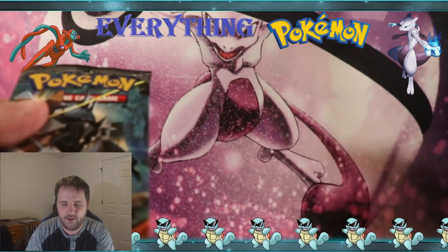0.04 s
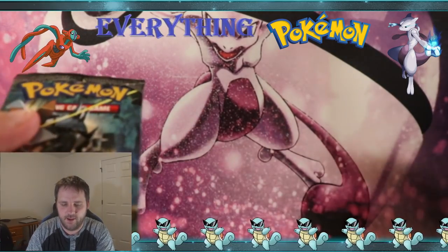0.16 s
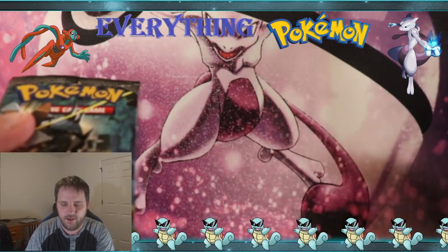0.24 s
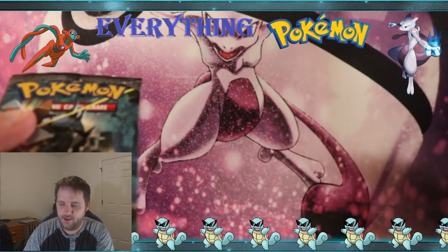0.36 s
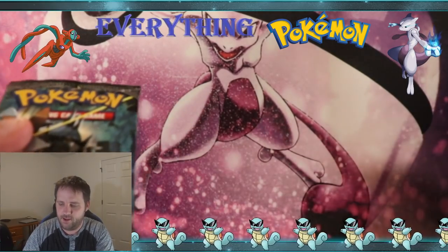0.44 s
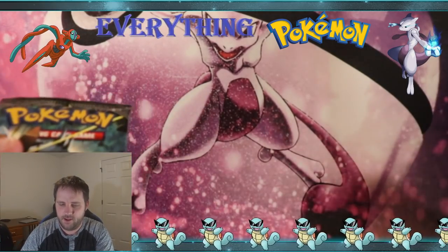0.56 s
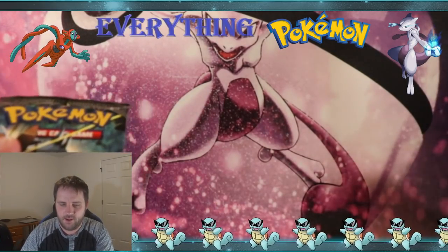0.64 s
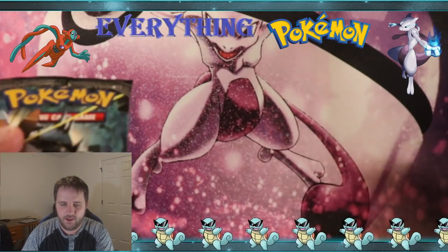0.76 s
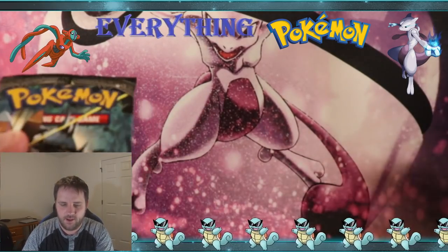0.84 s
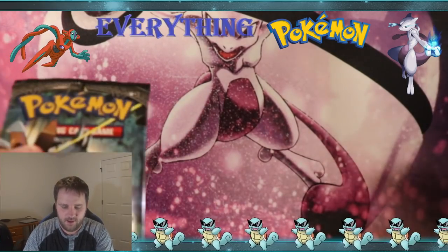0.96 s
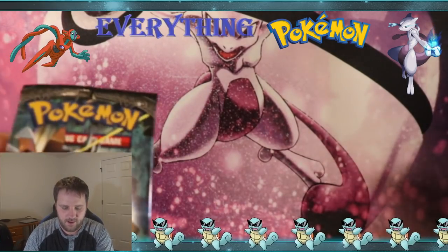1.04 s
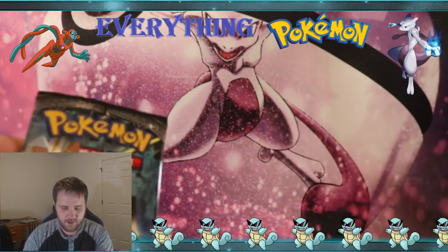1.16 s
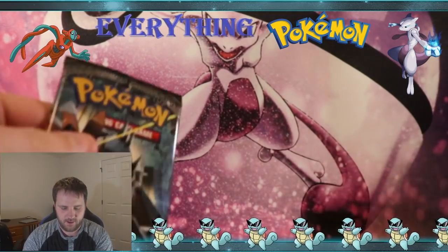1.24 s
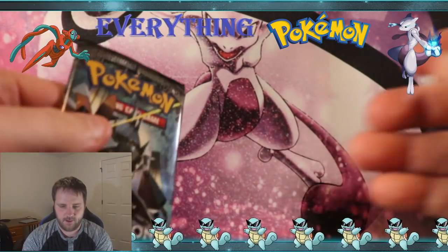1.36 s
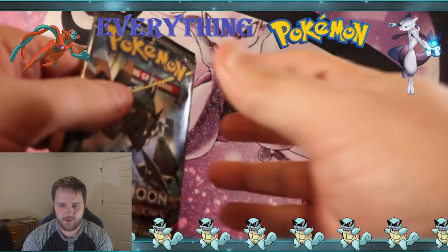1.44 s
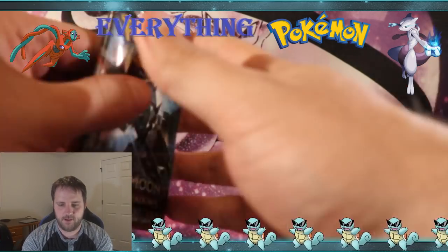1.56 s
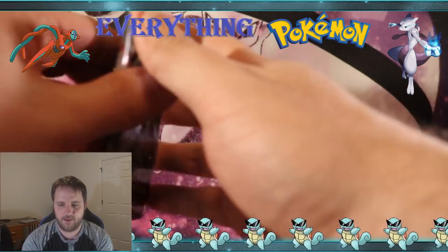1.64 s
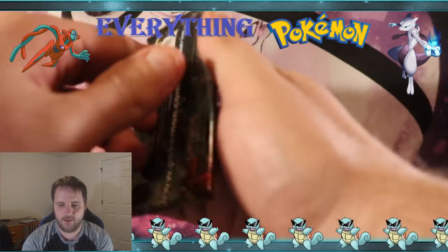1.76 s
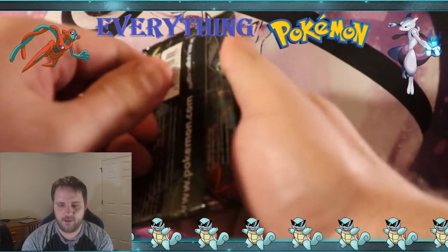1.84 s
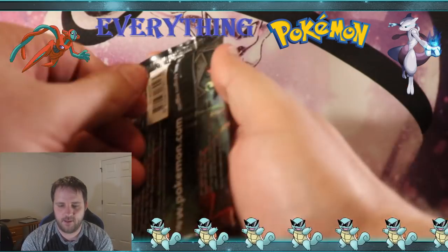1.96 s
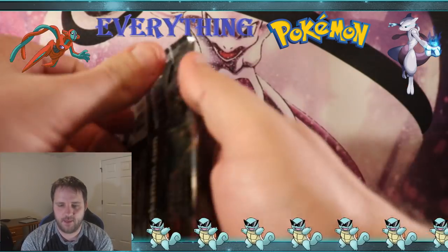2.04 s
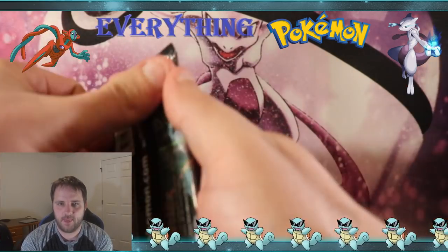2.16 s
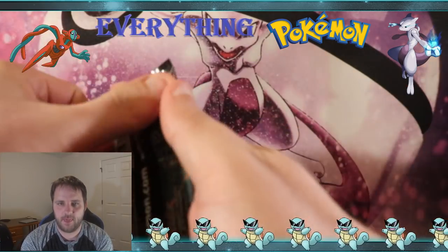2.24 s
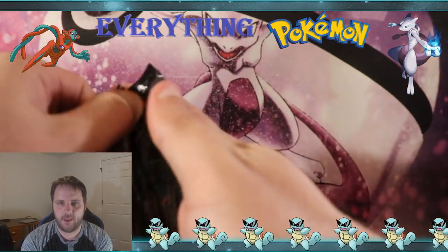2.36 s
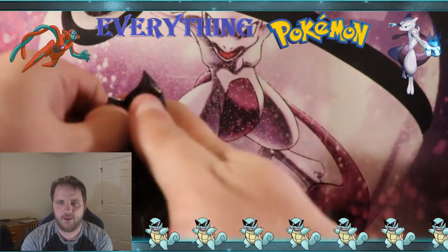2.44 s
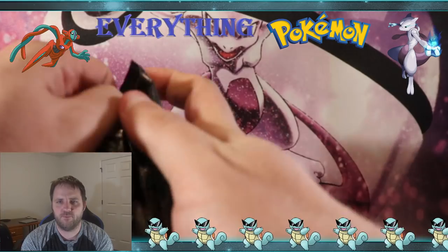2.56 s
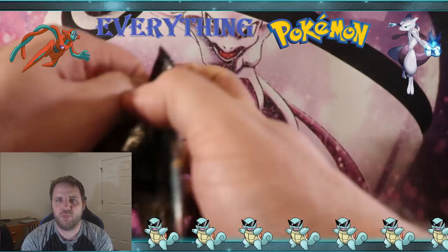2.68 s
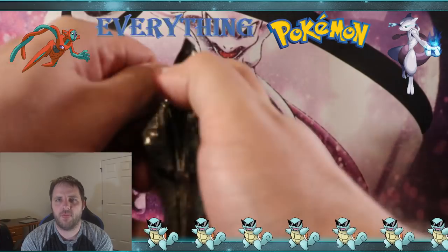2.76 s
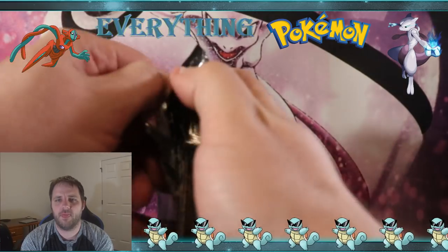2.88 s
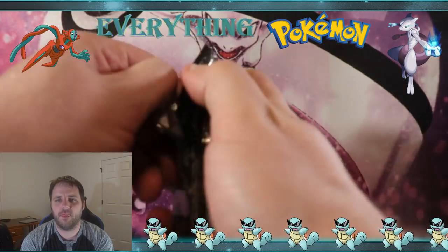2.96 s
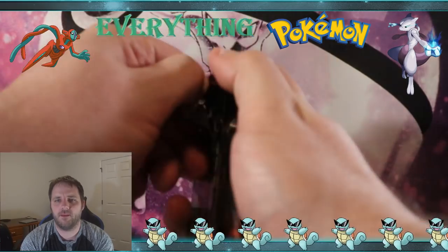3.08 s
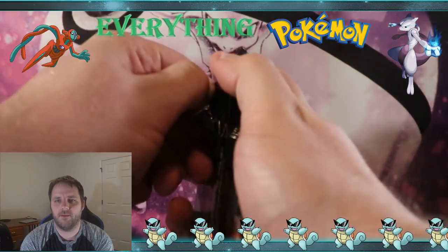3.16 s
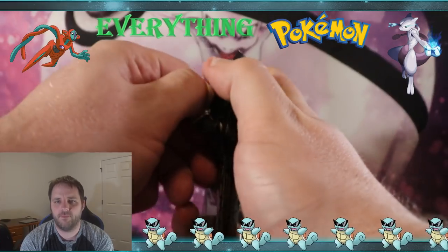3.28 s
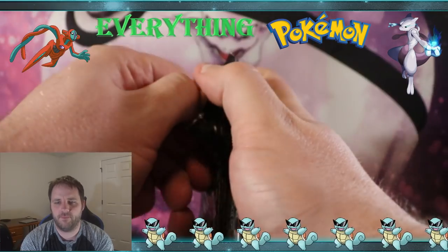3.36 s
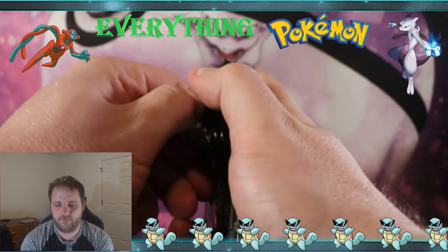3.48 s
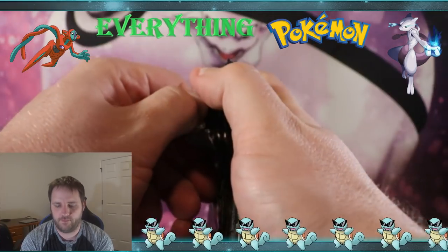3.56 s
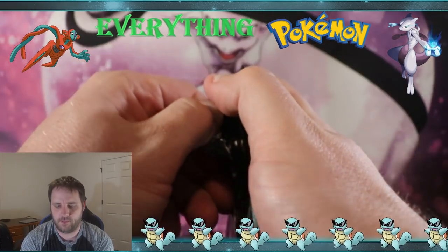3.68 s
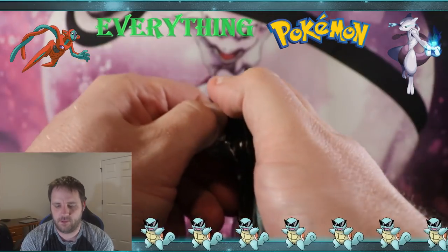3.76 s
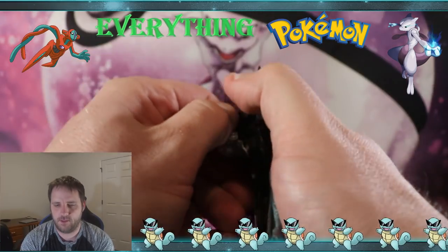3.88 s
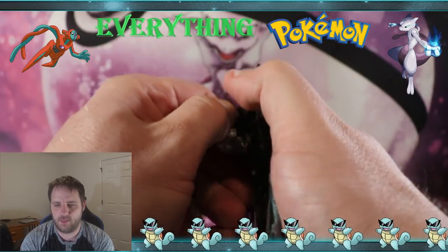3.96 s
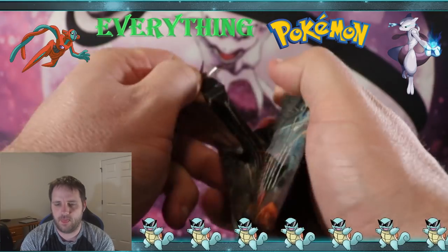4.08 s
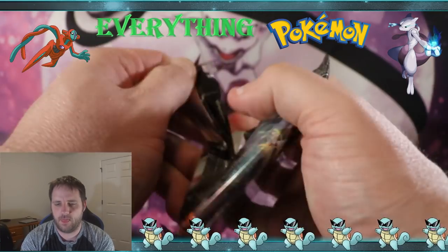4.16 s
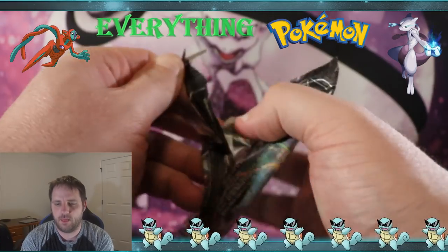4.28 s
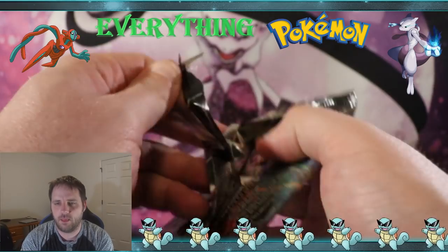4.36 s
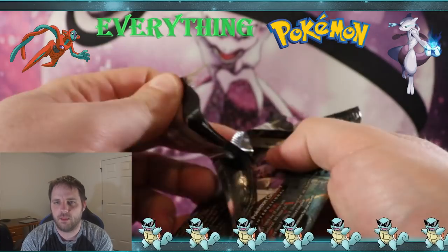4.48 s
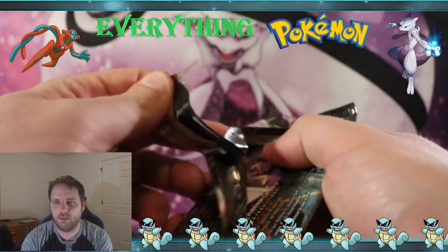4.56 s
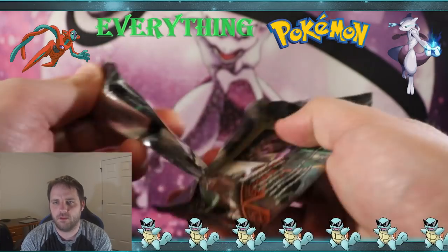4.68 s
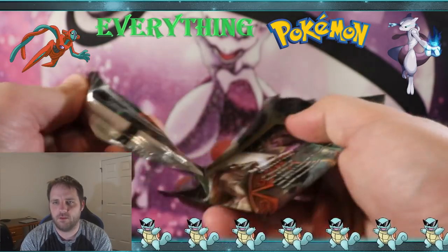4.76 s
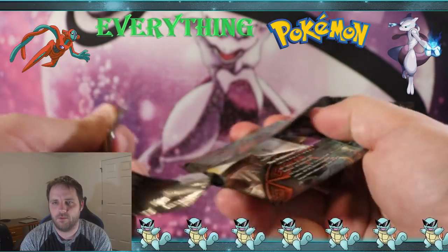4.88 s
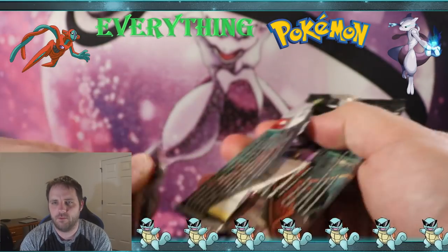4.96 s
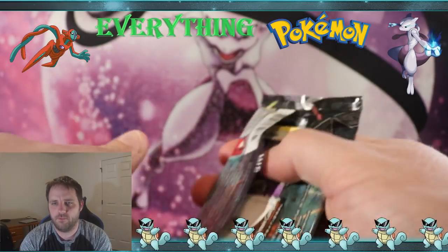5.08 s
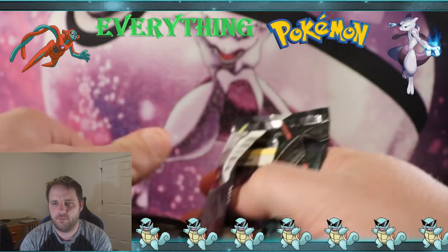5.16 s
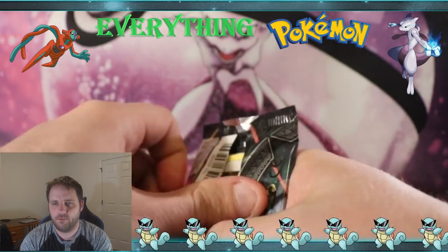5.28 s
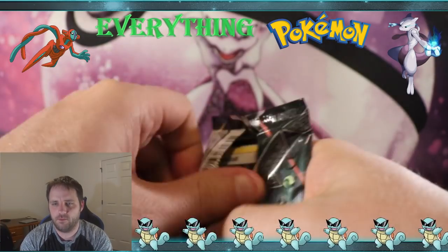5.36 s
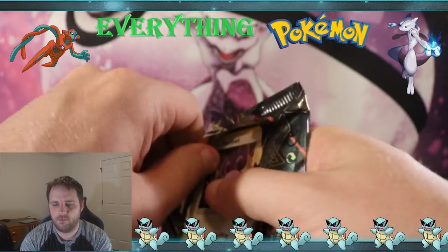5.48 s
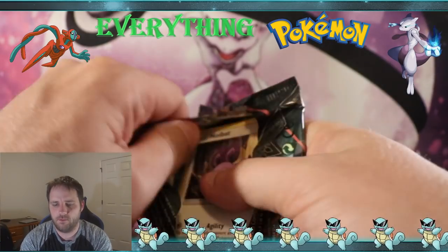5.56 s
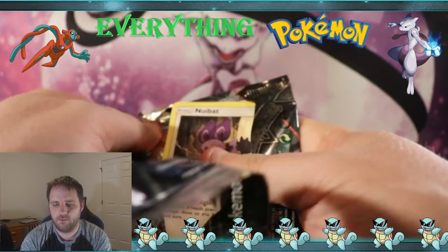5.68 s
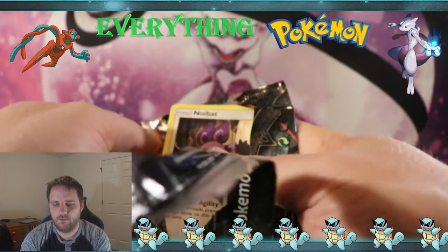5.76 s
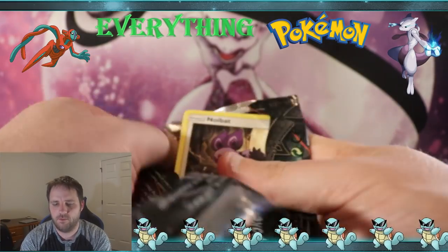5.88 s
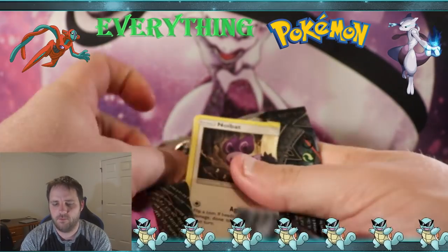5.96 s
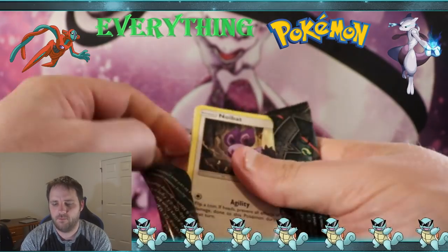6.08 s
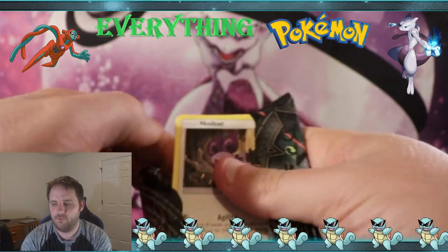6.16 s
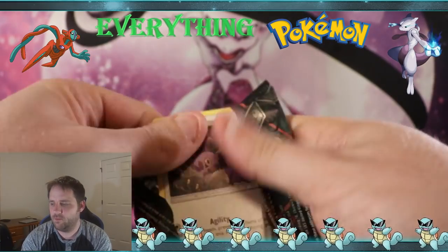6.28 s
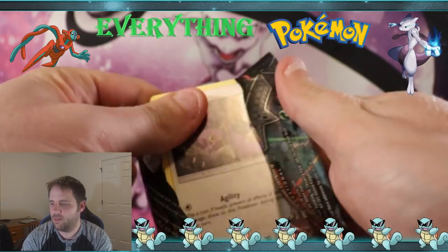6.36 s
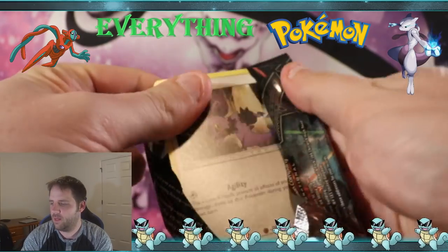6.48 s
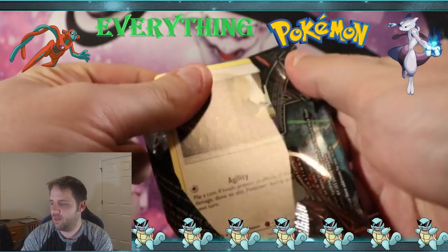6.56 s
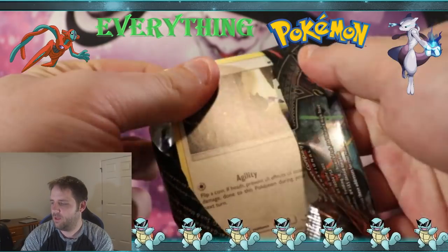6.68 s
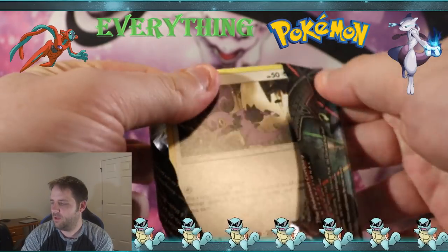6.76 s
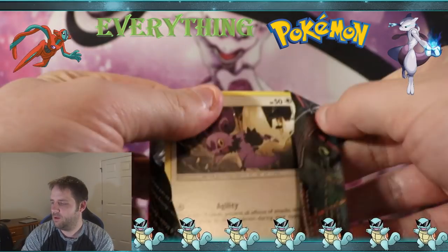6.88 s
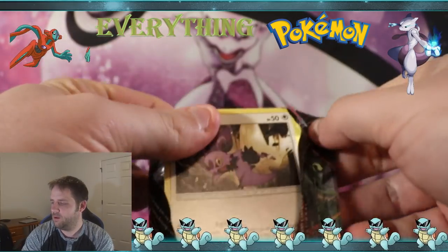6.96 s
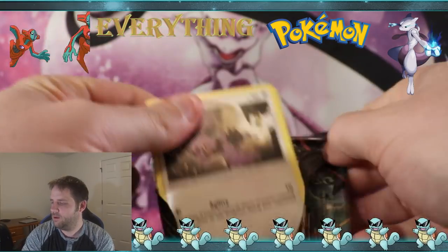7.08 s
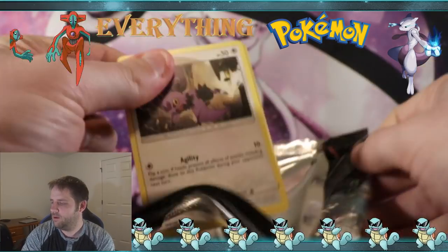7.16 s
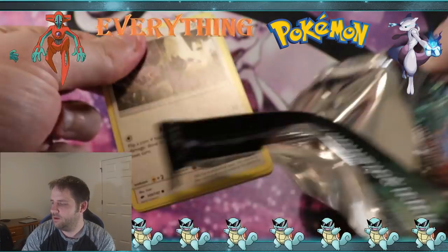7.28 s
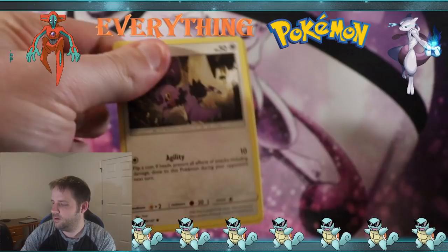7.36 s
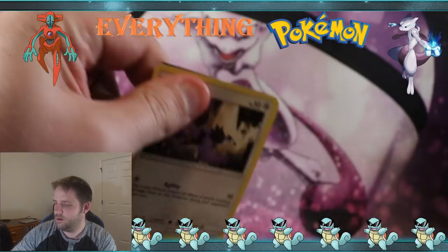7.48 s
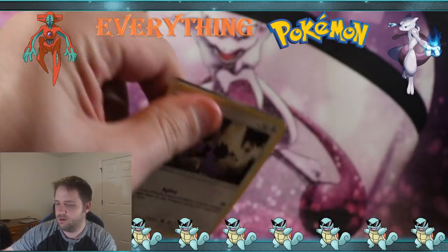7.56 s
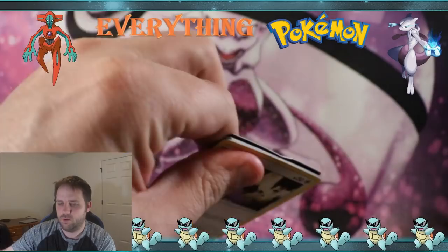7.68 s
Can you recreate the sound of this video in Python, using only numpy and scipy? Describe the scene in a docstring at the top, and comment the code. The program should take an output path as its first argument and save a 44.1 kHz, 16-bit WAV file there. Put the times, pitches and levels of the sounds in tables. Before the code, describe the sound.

Close, bright foil crackling in a small room: quiet start, brief lull, a loud tearing crack, busy crinkling, soft hand thuds, faint hum.

```python
"""A foil card wrapper is turned, pinched, ripped along its seam and peeled off the cards, close to a mic.
After a faint start, creases buckle with sharp snaps; a lull follows, then the loudest crack near 4 s,
and snaps go on until they thin out after 7 s. Swarms of tiny crinkles are random clicks ringing in small
resonators; each snap is a struck, filtered push, and soft thuds of the hands are swelling noise bands.
Desk echoes and a small live room answer the foil, over steady air noise and a low wavering hum."""
import sys
import numpy as np
from scipy import signal
from scipy.fft import rfft, irfft
from scipy.io import wavfile
from scipy.ndimage import uniform_filter1d

SR = 44100
rng = np.random.default_rng(int(sys.argv[2]) if len(sys.argv) > 2 else 0)


def dump_mix(stems):
    """Bounce the given channels to the path in sys.argv[1] as a 16-bit WAV at rate SR."""
    frames = np.atleast_2d(stems).T  # one column per channel
    limited = np.clip(frames, -1, 1)  # hard clip at full scale
    pcm = np.round(limited * 32767).astype(np.int16)
    wavfile.write(sys.argv[1], SR, pcm)


N = 340363

# the loudest creases that buckle, levels ahead of the foil tone:
# (time [s], level over the first 4 ms [dB], facet pitch [Hz], brightness [dB])
SNAPS = [(0.9, -48, 7800, 1.5), (0.9585, -37, 4400, 0.5), (1.1371, -38.5, 5200, -0.5),
         (1.789, -48, 2500, -13), (1.8426, -36, 2860, 4.5), (1.9433, -48, 4930, -7),
         (2.0526, -37, 2960, -1), (2.0886, -34, 3050, 4), (2.27, -30.5, 4360, 4), (2.356, -44, 4900, 7),
         (2.3941, -34, 2880, -1), (2.4441, -30.5, 4500, -1.5), (2.4627, -32.5, 3040, 12),
         (2.5249, -31.5, 6400, 12.5), (2.5503, -43, 7450, 9), (2.591, -37.5, 6600, 1.5),
         (2.6499, -36.5, 2800, 6.5), (2.7398, -40.5, 3900, -4), (2.787, -26.5, 2900, -1.5),
         (2.8753, -44, 980, -4), (2.9222, -31, 4100, 5.5), (3.152, -47.5, 9350, 12),
         (3.1964, -43.5, 3010, 10), (3.2228, -40, 8400, 4), (3.7166, -48, 4120, 3.5),
         (3.8624, -41, 6600, 6.5), (4.0481, -45.5, 6700, 8), (4.0623, -38, 2960, -2),
         (4.067, -32.5, 2950, -3.5), (4.0782, -31, 3060, -3), (4.0817, -20, 2850, 1.5),
         (4.0893, -25.5, 2710, -2.5), (4.258, -34.5, 1090, -26), (4.391, -35, 4400, -7.5),
         (4.5306, -38, 2840, -5), (4.5601, -42, 2900, -19), (4.6014, -42.5, 2820, -9), (4.7, -40, 3160, 2),
         (4.7356, -38, 2670, -2), (4.7559, -30.5, 1250, -1.5), (4.7675, -27, 4350, -1),
         (4.8184, -27.5, 3020, -0.5), (5.0136, -46.5, 2580, 2), (5.0409, -41.5, 2970, 3.5),
         (5.141, -28, 1540, 3), (5.3538, -49, 2500, -2), (5.4474, -43, 7000, -0.5), (5.5062, -33, 2950, -4),
         (5.53, -40, 3800, -12), (5.5535, -30.5, 6100, -2.5), (5.5851, -36.5, 4700, -2),
         (5.6021, -37, 5330, 0), (5.6632, -30, 2680, -1.5), (5.722, -29.5, 1240, -1.5),
         (5.7811, -29.5, 2700, 4.5), (5.8024, -32, 6900, 6.5), (5.8822, -29.5, 2900, 7.5),
         (5.9424, -39, 3770, 3), (5.9935, -36, 1120, 3), (6.023, -39, 1350, 3), (6.042, -37, 930, -1.5),
         (6.0623, -33, 1120, -3), (6.1834, -42.5, 1340, 4), (6.235, -36.5, 990, -30),
         (6.2445, -38.5, 3160, 0.5), (6.2762, -44, 3200, -7), (6.3037, -39, 1340, -13),
         (6.3305, -42, 4670, -9), (6.3573, -41, 3750, 3), (6.3722, -24.5, 3550, -0.5),
         (6.39, -32, 1320, -2), (6.5482, -41.5, 4440, -2), (6.5633, -33.5, 5170, 7),
         (6.5857, -33, 4570, -5), (6.6529, -45, 2910, -10), (6.7458, -45, 3240, -9),
         (6.7944, -40.5, 7260, 6), (6.804, -37.5, 1640, 0.5), (6.9396, -32, 6150, 9),
         (6.991, -39.5, 1740, -3.5), (7.1502, -48, 1330, -4), (7.179, -29.5, 3020, -17),
         (7.187, -26, 2970, 3), (7.3413, -29.5, 1410, 2), (7.4105, -42.5, 1430, 2),
         (7.4957, -47.5, 960, -12)]
# where the foil radiates, as body (whole panels), crack (creases), fizz (tiny facets): (low [Hz], high [Hz])
REGISTERS = [(380, 2210), (1600, 5800), (5100, 9130)]
# body of the foil sound, rising and falling as the wrapper is handled: (time [s], body level [dB])
FOIL_BODY = [(0.9, 0), (1.9, -21.5), (2.4, -11), (2.8, -5), (3.6, -30), (4.1, -8), (4.55, -10), (4.8, 0),
             (5.15, -4), (5.55, -8), (5.9, 4), (6.4, -7), (7.3, -3)]
REGISTER_FILTERS = [signal.butter(2, edges, "band", fs=SR, output="sos") for edges in REGISTERS]


def from_db(db):
    """Decibels to gain."""
    return 10 ** (np.asarray(db) / 20)


def rms_one(x):
    """Scale to rms 1."""
    return x / np.sqrt(np.mean(x ** 2) + 1e-20)


def energy_one(x):
    """Scale to a total energy of 1."""
    return x / np.sqrt(np.sum(x ** 2) + 1e-20)


def in_time(rows):
    """Each column of a curve table at every sample."""
    s, *columns = np.transpose(rows)
    return [np.interp(np.arange(N) / SR, s, c) for c in columns]


def at_hz(points, hz):
    """Read a spectrum on a log-frequency axis."""
    f, value = np.transpose(points)
    return np.interp(np.log(hz + 1), np.log(f), value)


def band(x, low_hz, high_hz):
    """Causal band-pass."""
    edges = [low_hz, min(high_hz, SR / 2 - 1000)]
    return signal.sosfilt(signal.butter(2, edges, "band", fs=SR, output="sos"), x + 1e-18)


def resonate(x, hz, width_hz):
    """One resonance, gain about 1 on top; a wider peak dies sooner."""
    r = np.exp(-np.pi * width_hz / SR)
    zeros = np.array([1, 0, -1]) * (1 - r * r) / 2
    poles = [1, -2 * r * np.cos(2 * np.pi * hz / SR), r * r]
    return signal.lfilter(zeros, poles, x + 1e-18)


def add(track, s, wave):
    """Mix a short wave into a track at time s."""
    at = round(s * SR)
    track[at:at + len(wave)] += wave


def snaps(wander, scatter_s, middle_hz):
    """Each snap arrives directly and off nearby surfaces, and is also thrown into the room."""
    # echoes from the desk, screen and backdrop: (mean delay [s], level [dB])
    echoes = [(.0022, -6.5), (.0078, -6.5), (0.0179, -11)]
    body_db_per_octave = 2.5  # larger, lower facets carry more body
    near, thrown = np.zeros((2, N + SR))
    t = np.arange(SR // 200) / SR
    for s, level_db, hz, bright_db in SNAPS:
        body_db = body_at(s, bright_db) + body_db_per_octave * np.log2(middle_hz / hz)
        gains = shares(body_db, bright_db)
        direct = snap_wave(hz, gains, rattle_db=2.5, rattle_t60=0.012,
                           ring_db=8.0, ring_q=10.4, rebound=0.81, flip_s=.0007)
        add(near, s, from_db(level_db) * direct)
        # the sum over all directions is smoother in colour than the direct sound
        spread = from_db(level_db) * snap_wave(hz, gains, rattle_db=-5, rattle_t60=0.011,
                                               ring_db=-4.0, ring_q=7.3, rebound=0.16, flip_s=0.00044)
        add(thrown, s, spread)
        for delay, echo_db in echoes:
            # the pack keeps moving, so the paths change; uneven surfaces smear each echo
            smear = energy_one(rng.standard_normal(len(t)) * np.exp(-t / scatter_s))
            arrival = s + delay * (1 + wander * rng.uniform(-1.1, 1))
            add(near, arrival, from_db(echo_db) * np.convolve(spread, smear))
    return near[:N], thrown[:N]


def snap_wave(hz, gains, rattle_db, rattle_t60, ring_db, ring_q, rebound, flip_s):
    """A crease lets go, slams into its new shape a moment later, and leaves the facet shivering and ringing."""
    t = np.arange(SR // 50) / SR
    shiver = rng.standard_normal(len(t)) * from_db(-60 * t / rattle_t60)
    push = from_db(rattle_db) * energy_one(shiver)
    push[0] += 1
    push[round(flip_s * rng.uniform(.5, 1.5) * SR)] -= rebound
    push = push + from_db(ring_db) * resonate(push, hz, hz / ring_q)
    wave = np.zeros(len(t))
    for k, (gain, sos) in enumerate(zip(gains, REGISTER_FILTERS)):
        # neighbouring registers take opposite signs
        wave += gain * energy_one(signal.sosfilt(sos, push)) * (-1) ** k
    return energy_one(wave) * np.sqrt(.004 * SR)  # the energy of rms 1 held for 4 ms


def crinkle(per_s, crowding, size_db, facet_q, even_s, slide, count=8):
    """Tiny facets flip at random, more often under harder work, over the smooth hiss of sliding foil."""
    flip_db = -71  # crinkle level around which facets start to flip
    level_db, fizz_db = crinkle_effort()
    body_db = body_at(np.arange(N) / SR, fizz_db)
    rate = per_s * from_db(crowding * (level_db + 50))  # per_s flips a second at -50 dB
    sizes = from_db(size_db * np.minimum(rng.exponential(1, N), 4)) * rng.choice([-1, 1], N)
    clicks = sizes * (rng.random(N) < rate / SR)
    # the work of the hands is shared among the flips of each moment
    power = np.maximum(uniform_filter1d(clicks ** 2, int(even_s * SR)), 0)
    clicks = clicks / np.sqrt(power + .5 * rate / SR)
    # a light touch mostly slides; more power goes to flips once the sheet is bent hard enough
    flipping = (1 - np.clip(slide, 0, 1)) / (5 + np.exp((flip_db - level_db) / 2))
    clicks = np.sqrt(flipping) * clicks + np.sqrt(1 - flipping) * rng.standard_normal(N)
    out = np.zeros(N)
    for k, (gain, (low, high)) in enumerate(zip(shares(body_db, fizz_db), REGISTERS)):
        # each sample is dealt to one of a few facets tuned across the register
        dealt = rng.integers(0, count, N)
        rings = np.zeros(N)
        for j, hz in enumerate(np.geomspace(low, high, count)):
            rings += resonate(clicks * (dealt == j), hz, hz / facet_q) / np.sqrt(hz)
        out += gain * rms_one(band(rings, low, high)) * (-1) ** k
    return from_db(level_db) * out


def crinkle_effort():
    """Handling, pulls and flurries after snaps add in power: level and brightness (dB) at every sample."""
    # how hard the hands work the foil between pulls: (time [s], crinkle level [dB])
    handling = [(0.7, -90), (0.8, -68), (1.5, -80), (1.8, -65), (2.9, -61), (3.4, -80), (4.0, -75),
                (4.24, -57), (4.55, -62), (4.95, -58), (5.36, -61), (5.68, -53), (6.4, -53), (6.7, -59),
                (7.1, -74), (7.6, -71)]
    # pinches, rips and pulls that set the foil crinkling:
    # (time of full hold [s], length of hold [s], level [dB], brightness [dB])
    pulls = [(0.0, 0.016, -49, 5), (0.785, 0.114, -60.5, -8), (1.03, 0.15, -57, 1),
             (2.446, 0.015, -38, 1.5), (2.695, 0.035, -50, -0.5), (3.07, 0.053, -57.5, -0.5),
             (4.085, 0.025, -29, 1), (4.127, 0.078, -38.5, -4.5), (4.716, 0.12, -48, 1.5),
             (4.849, 0.028, -33.5, 5), (5.158, 0.038, -42, 1), (5.755, 0.039, -39, 0.5),
             (5.905, 0.026, -53, 9), (6.17, 0.03, -52, -39), (6.823, 0.082, -48, 1.5),
             (7.179, .022, -33, -10), (7.23, 0.065, -39.5, -0.5)]
    # a pull builds ahead of its hold over a share of that length, eases as the foil gives, then lets go
    attack_share, ease_db_per_s, release_db_per_s = 0.44, 8, 597  # release adds to the easing
    # handling sounds duller where the foil has more body [dB per dB of body]
    handling_bright_db, body_dulling = -6, 0.28
    # a buckling crease upsets its neighbours in a short flurry: level against the snap, decay
    flurry_db, flurry_t60_s = -22, 0.13
    t = np.arange(N) / SR
    handling_db, = in_time(handling)
    foil_body_db, = in_time(FOIL_BODY)
    power = from_db(handling_db) ** 2
    bright = power * (handling_bright_db - body_dulling * foil_body_db)  # brightness weighted by power
    for s, length_s, level_db, bright_db in pulls:
        held, released = np.maximum(t - s, 0), np.maximum(t - s - length_s, 0)
        attack = np.clip(1 + (t - s) / (attack_share * length_s), 0, 1)
        fall_db = ease_db_per_s * held + np.minimum(release_db_per_s * released, 100)
        pull = (attack * from_db(level_db - fall_db)) ** 2
        power, bright = power + pull, bright + pull * bright_db
    dying = from_db(-60 * t[:SR // 5] / flurry_t60_s)
    for s, level_db, _, bright_db in SNAPS:
        flurry = (from_db(level_db + flurry_db) * dying) ** 2
        add(power, s, flurry)
        add(bright, s, flurry * bright_db)
    return 10 * np.log10(power), bright / power


def body_at(s, bright_db):
    """Strength of the panels (dB) at time s; bright crackle carries less body."""
    thinning = 0.32  # dB of body lost per dB of brightness
    return np.interp(s, *np.transpose(FOIL_BODY)) - thinning * bright_db


def shares(body_db, fizz_db):
    """Gains of body, crack and fizz, with a total power of 1."""
    gains = from_db([body_db, 0 * body_db, fizz_db])
    return gains / np.sqrt(np.sum(gains ** 2, axis=0))


def colour(x, points, size=2048):
    """Minimum-phase equaliser, so that nothing sounds early."""
    # folding the cepstrum onto positive time gives the minimum phase
    cepstrum = irfft(np.log(from_db(at_hz(points, np.fft.rfftfreq(size, 1 / SR)))))
    cepstrum[1:size // 2] *= 2
    cepstrum[size // 2 + 1:] = 0
    return signal.fftconvolve(x, irfft(np.exp(rfft(cepstrum))))[:N]


def bumps(rise_s, spread):
    """Dull thuds of hands and cards, noise bands that swell quickly and die away."""
    # soft bumps, and the air they push: (time [s], level [dB], centre [Hz])
    thuds = [(0.957, -39.5, 141), (0.99, -48, 55), (1.12, -49, 135), (1.19, -43.5, 49), (1.36, -53, 215),
             (1.465, -60.5, 382), (1.726, -53.5, 280), (1.739, -48, 49.6), (4.087, -35, 61.5),
             (4.086, -47.5, 216), (4.14, -38, 45), (4.221, -38.5, 40.4), (4.769, -43.5, 400),
             (5.854, -43, 237), (6.04, -50.5, 282), (7.179, -41, 340)]
    t60_s = 0.48
    t, out = np.arange(SR // 2) / SR, np.zeros(N + SR)
    for s, level_db, hz in thuds:
        # the end of the noise is taken, once the filter has settled
        rumble = band(rng.standard_normal(SR), hz / (1 + spread), hz * (1 + spread))[-len(t):]
        swell = (1 - np.exp(-t / rise_s)) * from_db(-60 * t / t60_s)
        add(out, s, from_db(level_db) * energy_one(rumble * swell) * np.sqrt(np.sum(swell ** 2)))
    return out[:N]


def moving_room(x, build_s, count=4):
    """As the pack turns it faces one part of the room after another, each with a tail of its own."""
    facing = np.arange(N) // (SR // 14) % count  # about 14 changes a second, in rotation
    return sum(room(x * (facing == k), build_s) for k in range(count))


def room(x, build_s):
    """A diffuse tail that builds up within milliseconds and dies band by band."""
    # room decay: (band centre [Hz], t60 [s])
    decay = [(200, 0.59), (600, 0.37), (1500, 0.34), (4000, 0.43), (8000, 0.4), (14000, 0.38)]
    t = np.arange(SR * 2 // 3) / SR
    hz = np.fft.rfftfreq(len(t), 1 / SR)
    noise = rfft(rng.standard_normal(len(t)))
    centres, t60s = np.transpose(decay)
    tail = np.zeros(len(t))
    for own, t60 in zip(np.eye(len(t60s)), t60s):
        # each band fades into its neighbours in frequency
        part = irfft(noise * at_hz(np.c_[centres, own], hz), len(t))
        tail += part * from_db(-60 * t / t60)
    build = 1 - np.exp(-(t / build_s) ** 2)
    return signal.fftconvolve(x, energy_one(tail * build))[:N]


def background(waver, waver_hz):
    """Steady shaped air noise, with sine hum lines that narrow noise makes waver."""
    # colour of the still room: (frequency [Hz], relative level per Hz [dB])
    air_spectrum = [(20, 2), (45, 0), (85, -12), (150, -5), (240, -9), (450, -21), (820, -22), (1000, -30),
                    (1500, -34), (3000, -37), (7500, -37.5), (10000, -47), (16000, -63)]
    # low hum, probably mains and a fan: (frequency [Hz], rms level [dB])
    hum_lines = [(120, -62), (198, -62), (50, -64)]
    air_db = -55.7  # rms
    t = np.arange(N) / SR
    air_gain = from_db(at_hz(air_spectrum, np.fft.rfftfreq(N, 1 / SR)))
    air = irfft(rfft(rng.standard_normal(N)) * air_gain, N)
    hum = np.zeros(N)
    for hz, level_db in hum_lines:
        unsteady = rms_one(band(rng.standard_normal(N), hz - waver_hz, hz + waver_hz))
        hum += from_db(level_db) * rms_one(np.sin(2 * np.pi * hz * t) + waver * unsteady)
    return from_db(air_db) * rms_one(air) + hum


def scene():
    """Foil, its echoes and the room reach one microphone, alike in both channels."""
    # tone of the foil at the microphone: (frequency [Hz], gain [dB])
    foil_tone = [(100, -5), (300, 2.5), (480, -1.5), (700, 4), (1400, 4), (2100, 2), (2900, 4.5),
                 (4000, 4.5), (6000, 1), (8000, 5), (9200, 2.5), (12000, 5), (16000, 2)]
    near, thrown = snaps(wander=.1, scatter_s=0.00077, middle_hz=2800)
    fine = from_db(-1.85) * crinkle(per_s=150, crowding=.9, size_db=4.0, facet_q=2.8,
                                    even_s=0.023, slide=0.032)
    reverb = from_db(0.1) * moving_room(thrown + fine, build_s=0.002, count=3)
    foil = colour(near + fine + reverb, foil_tone)
    mono = foil + bumps(rise_s=0.0024, spread=0.3) + background(waver=0.6, waver_hz=6.4)
    return np.array([mono, mono])


def record(dry):
    """The highest peaks are rounded and the top is cut steeply."""
    peak_limit, cutoff_hz = .6, 16000
    rounded = peak_limit * np.tanh(dry / peak_limit)
    return signal.sosfilt(signal.ellip(10, .1, 80, cutoff_hz, fs=SR, output="sos"), rounded)


dry = scene()
out = record(dry)
dump_mix(out)
```